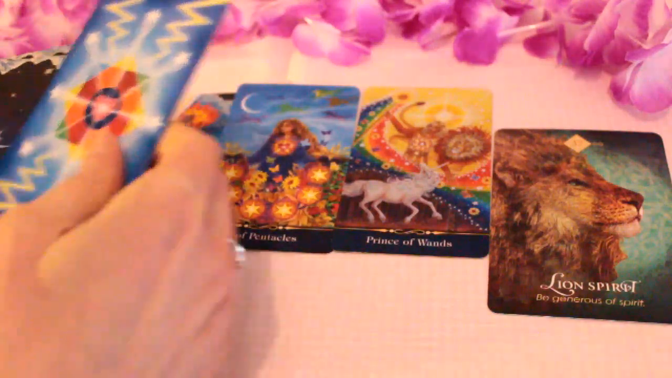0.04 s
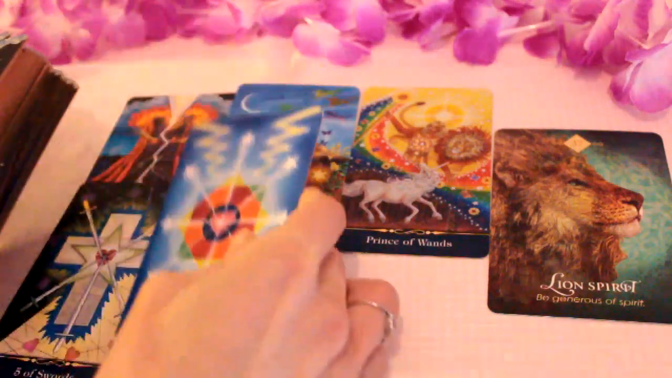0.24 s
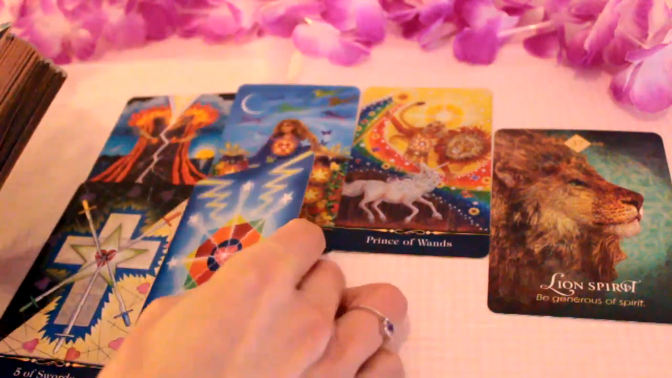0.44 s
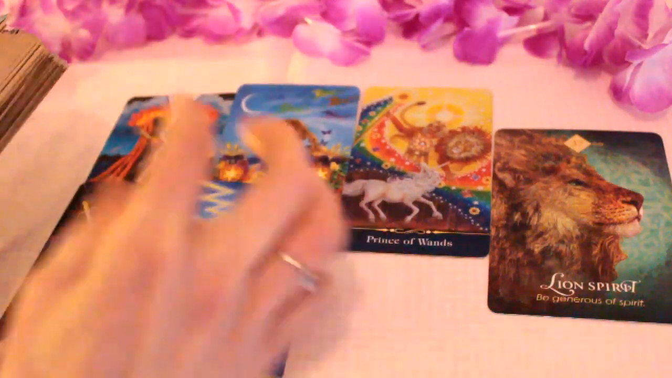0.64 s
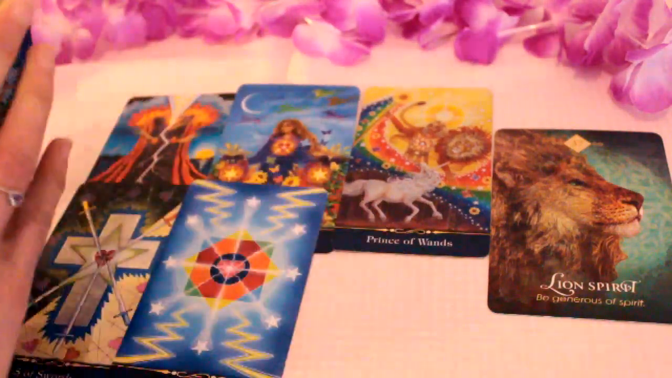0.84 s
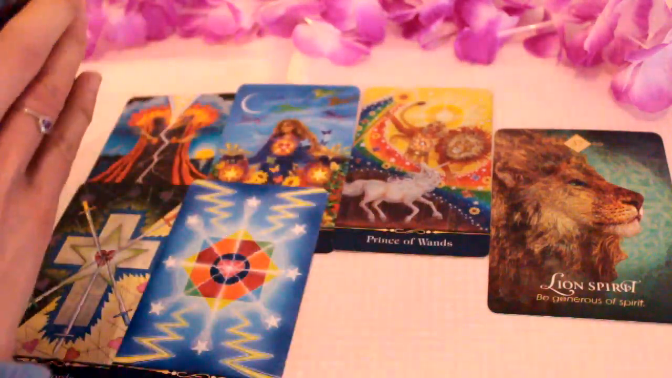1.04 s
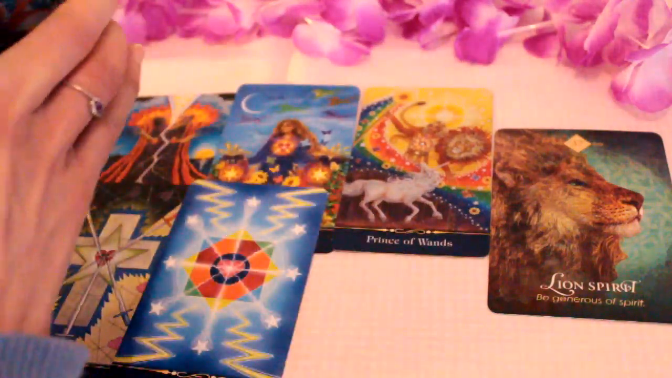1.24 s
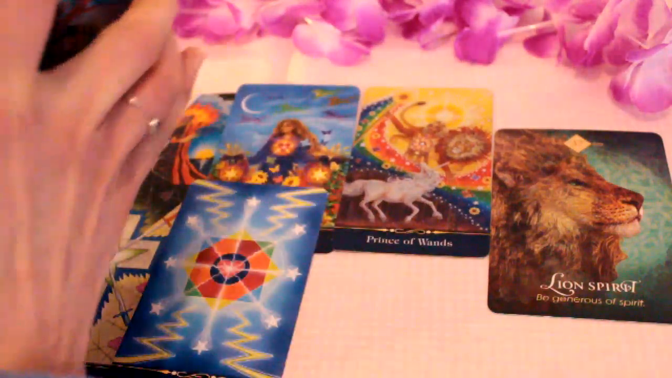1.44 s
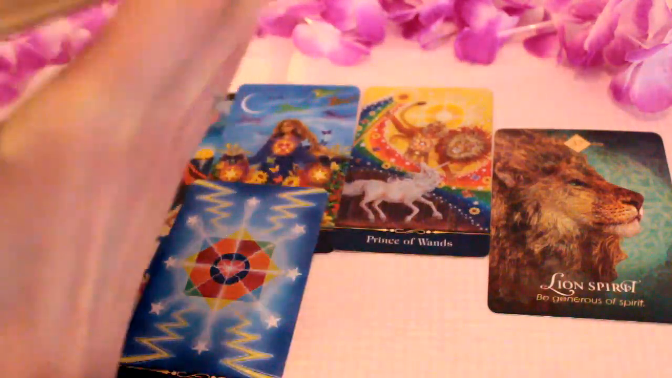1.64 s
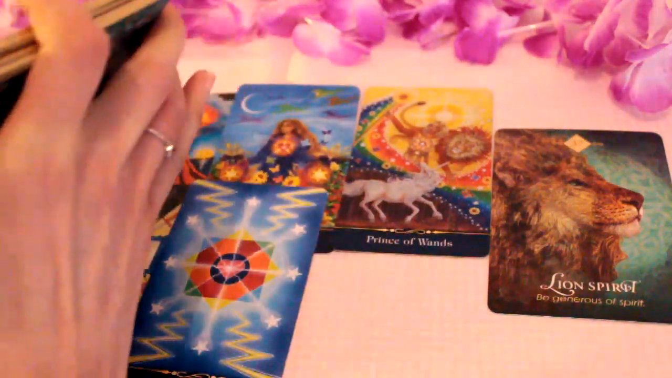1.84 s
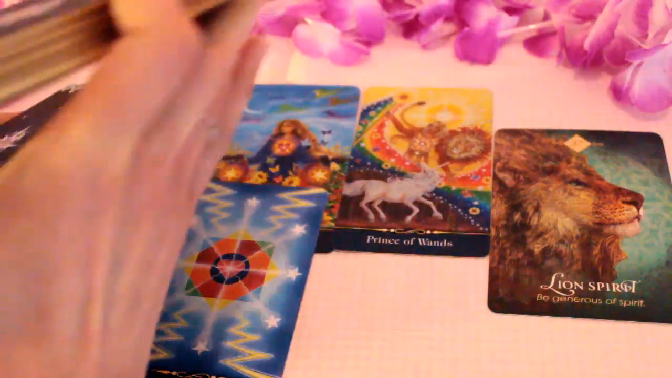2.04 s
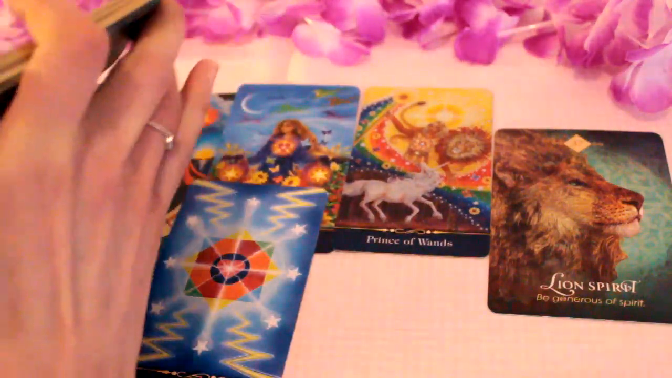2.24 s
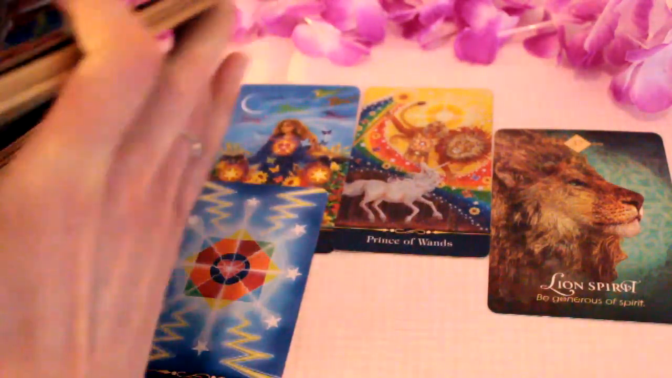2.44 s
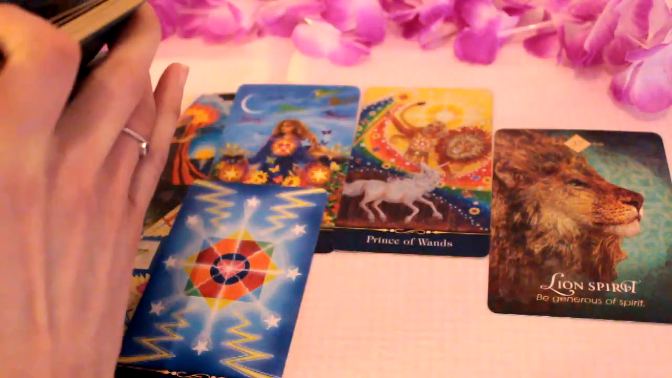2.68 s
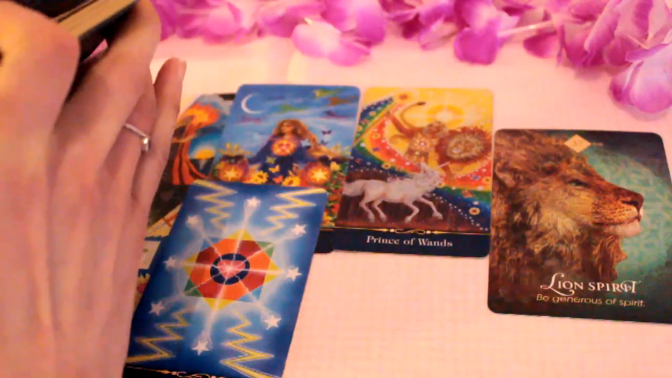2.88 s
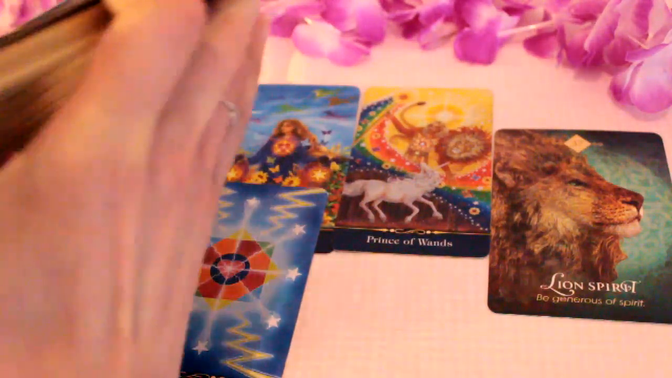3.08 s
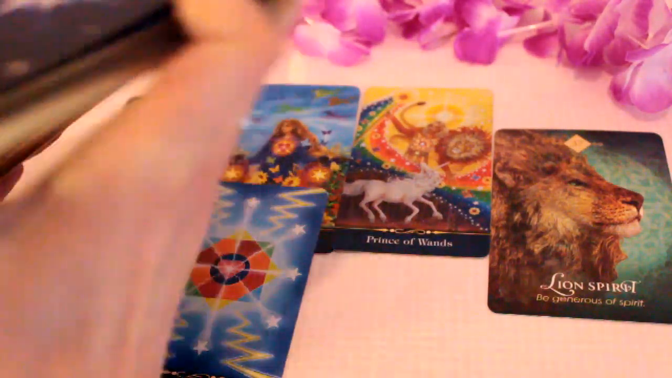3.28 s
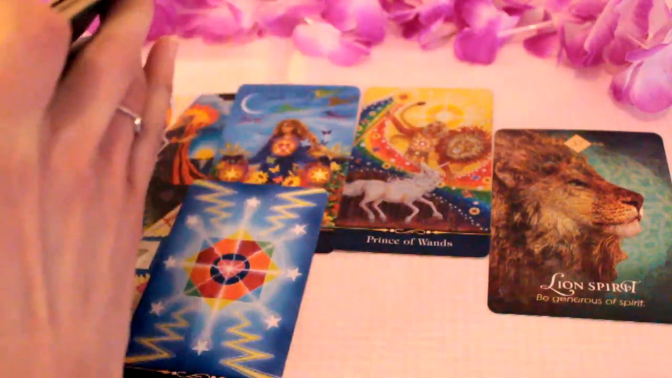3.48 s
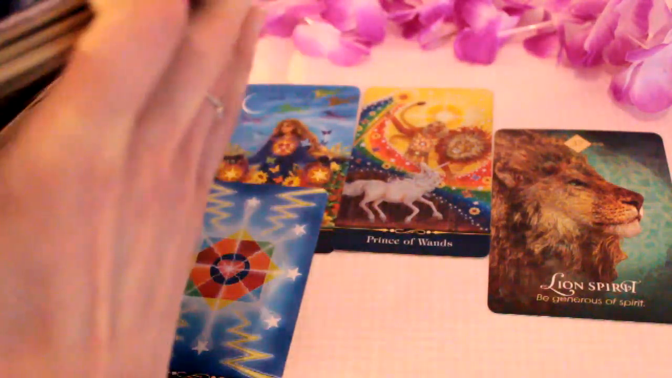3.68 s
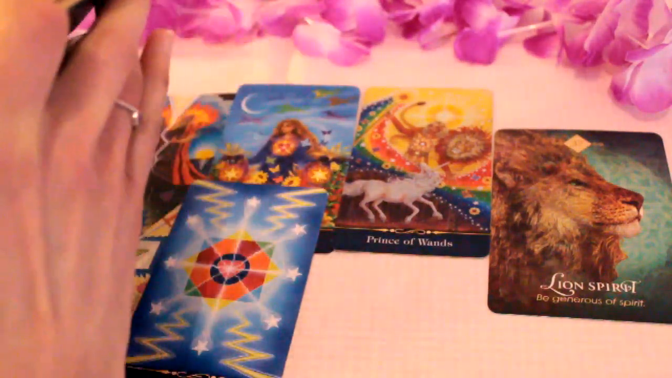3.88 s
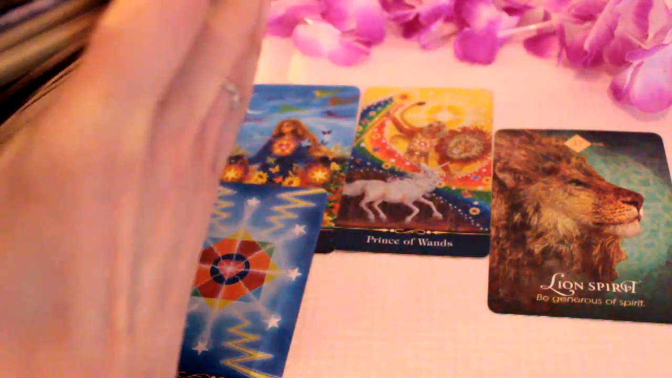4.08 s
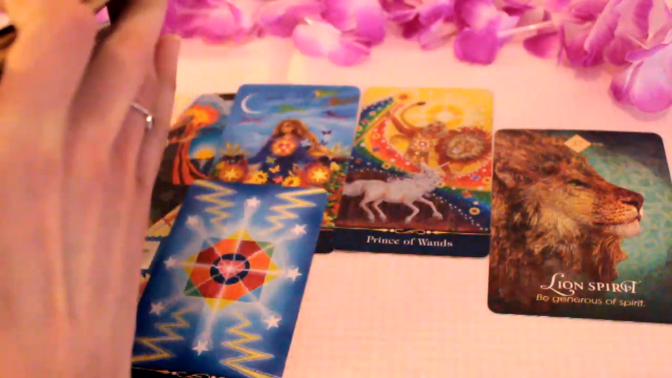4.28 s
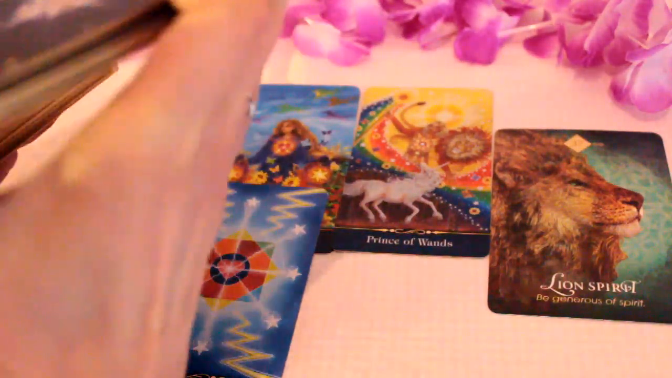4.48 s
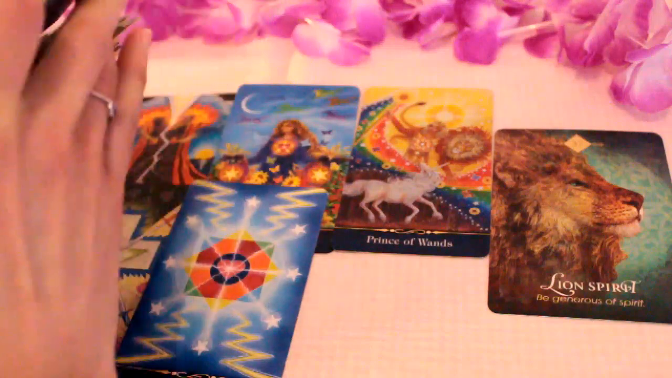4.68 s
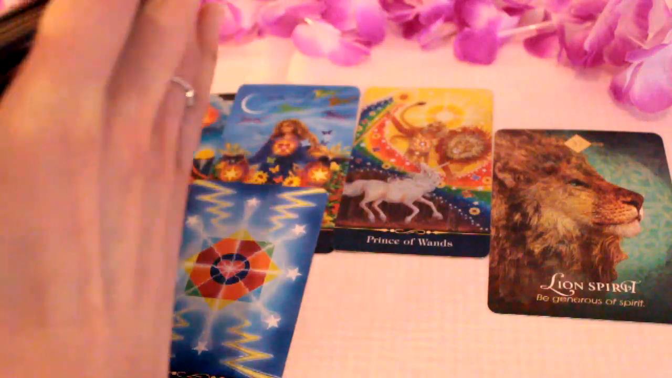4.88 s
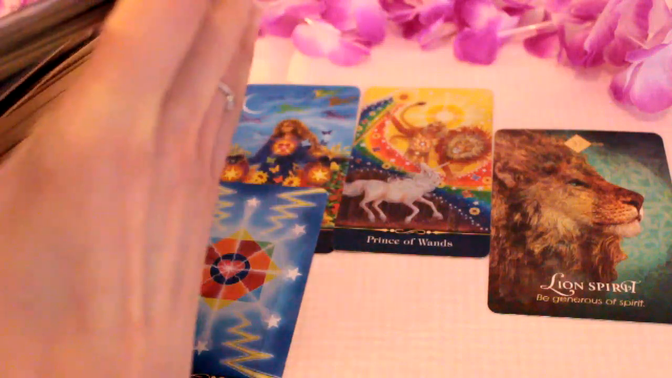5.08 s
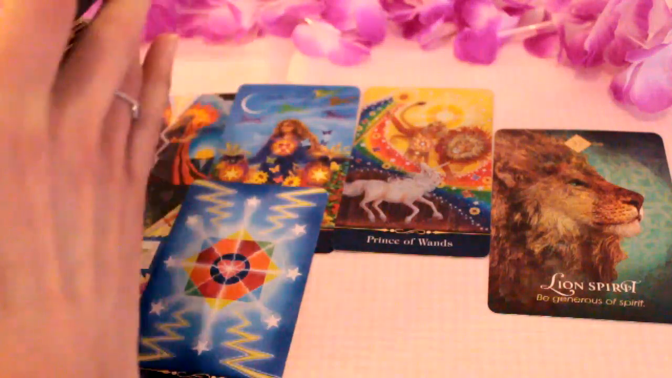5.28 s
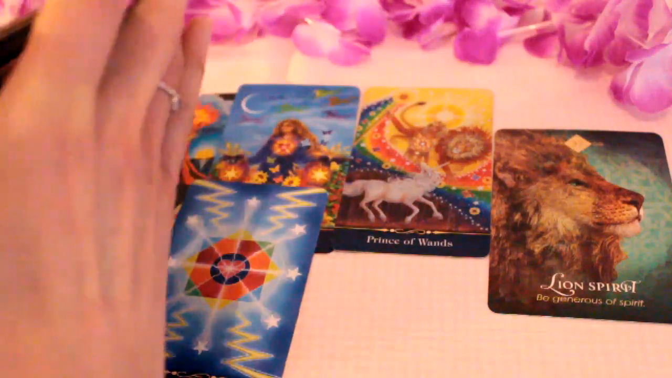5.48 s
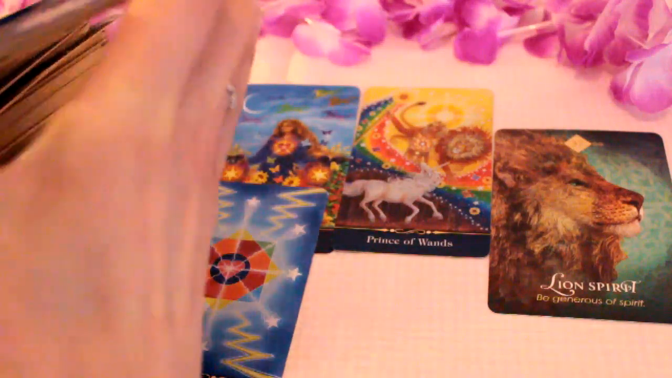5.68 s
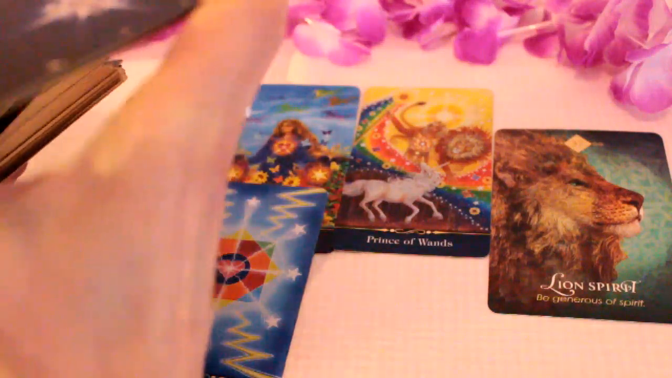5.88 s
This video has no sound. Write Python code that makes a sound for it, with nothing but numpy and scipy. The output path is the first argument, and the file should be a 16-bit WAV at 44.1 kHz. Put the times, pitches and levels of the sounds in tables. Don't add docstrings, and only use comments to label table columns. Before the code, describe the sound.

A stiff card deck is shuffled overhand close to the microphone, with papery slides, edge ticks, hollow packet knocks and one hard slap near three seconds.

```python
import sys
import numpy as np
from scipy import signal
from scipy.fft import rfft, irfft, next_fast_len
from scipy.io import wavfile
from scipy.ndimage import uniform_filter1d, map_coordinates

SR = 44100
rng = np.random.default_rng(int(sys.argv[2]) if len(sys.argv) > 2 else 0)


def persist_wave(psi):
    counts = np.round(np.clip(psi, -1, 1) * 32767).astype(np.int16)
    wavfile.write(sys.argv[1], SR, np.atleast_2d(counts).T)


def to_linear_factor(level_db):
    exponent = np.asarray(level_db, float) / 20
    return 10 ** exponent


N = 261072

# touch_s, length_s, touch_pressure_db, lift_pressure_db, hiss_over_body_db
GLIDES = [(.13, 0.21, -57.5, -40, 3.5), (1.162, 0.073, -37.5, -55.5, 5), (1.24, 0.084, -53.5, -43.5, 6.5),
          (1.32, 0.13, -44.5, -54, 0), (1.5, 0.24, -52.5, -46.5, -15), (1.69, 0.1, -52, -47.5, 8),
          (1.84, 0.19, -42, -62, 1.5), (2.05, 0.094, -59.5, -33, 4), (2.157, 0.07, -47, -38.5, 5),
          (2.46, 0.055, -60, -26.5, 3.5), (2.55, 0.16, -47.5, -43.5, 9), (3.17, 0.063, -51, -22.5, -5),
          (3.26, 0.18, -40, -46, -1), (3.722, .05, -40.5, -36, 5), (3.74, 0.25, -40, -47.5, 7.5),
          (4.02, 0.036, -38, -27.5, -11), (4.07, .1, -40.5, -39.5, 5), (4.19, 0.1, -53, -45, 12),
          (4.3, 0.15, -46.5, -55, 10.5), (4.43, 0.091, -48, -45, 6), (4.51, 0.068, -40.5, -33, 3),
          (4.6, 0.169, -52, -39, 0), (5.09, 0.19, -49.5, -59, 11.5), (5.59, 0.064, -46.5, -26.5, 7),
          (5.66, .11, -30, -43, 9), (5.77, 0.13, -45, -53.5, 3.5)]
# touch_s, length_s, touch_pressure_db, lift_pressure_db, hiss_over_body_db
DRAGS = [(0.0, 0.11, -39, -52, -2), (.385, 0.18, -35.5, -62, -3), (.76, 0.033, -47.5, -36.5, -11),
         (.8, 0.17, -37, -53, -5), (2.24, 0.16, -39.5, -63, -12), (2.74, 0.113, -30.5, -32, -4),
         (2.9, 0.33, -36, -55, -20), (3.46, 0.11, -37.5, -61, -23), (4.78, 0.14, -40, -61, -22),
         (4.99, 0.081, -59, -38, 7.5), (5.24, 0.077, -55.5, -46.5, 1), (5.34, 0.12, -41.5, -55.5, -14)]
TOUCH_DB_PER_MS, LIFT_DB_PER_MS = 1.8, 0.75
HISS_GROWS = 1.18
GLIDE_LOW_DB, DRAG_LOW_DB = -7.5, 3
# frequency_hz, density_db
FACE_HISS = [(500, -33), (1500, -26), (4000, -3), (7000, 3), (10000, 2.5), (13500, -3), (15500, 0)]
# frequency_hz, density_db
LOW_FLEX = [(300, -15), (900, -13), (1300, -4), (1700, 2.5), (2300, -3.5), (3500, -6.5), (7000, -31)]
# frequency_hz, density_db
HIGH_FLEX = [(1200, -40), (2500, -1), (3300, -1), (4500, 0), (6000, -2), (8000, -8), (12000, -18)]
# frequency_hz, density_db
SKIM_HISS = [(6000, -23), (10000, -6), (14000, 2)]
SKIM_DB, SKIM_GROWS = -10, 0.78

# peak_s, level_db, hiss_over_body_db, body_hz, length_ms
SNAGS = [(.0015, -47, -10, 2500, 2.6), (.798, -35, -4, 2760, 24), (1.155, -42, 10, 4470, 3.2),
         (1.258, -54.5, 10, 3000, 24), (1.855, -40.5, -6, 1440, 17), (2.243, -30, -13, 4500, 2.5),
         (2.4921, -32, 2.5, 2330, 14), (2.6809, -35.5, 0, 2350, 26), (2.7483, -22, -15, 1480, 3.1),
         (2.7862, -19, -30, 3730, 4.3), (2.8165, -24, -30, 3800, 4.6), (2.797, -40, 9, 8000, 14),
         (3.208, -31, -28, 2430, 66), (3.2395, -20.5, -5, 2050, 3.4), (3.2901, -37.5, 7.5, 3920, 31),
         (4.023, -43, -14, 3970, 12), (4.035, -23.5, -18, 4950, 15), (4.301, -25, -14, 2550, 1.3),
         (4.45, -36.5, -25, 4330, 25), (4.476, -29, -19, 4430, 51), (4.5066, -19, 0.5, 3330, 34),
         (4.5457, -23, 3.5, 5900, 16), (5.052, -37, -3, 1580, 1.9), (5.0558, -36, 13.5, 7440, 11.5),
         (5.402, -52, -3, 9000, 22), (5.66, -24, -6, 5250, 12)]
# peak_s, level_db, hiss_over_body_db, body_hz, length_ms
SWELLS = [(.0181, -35.5, -5.5, 950, 37), (.224, -43, -16, 5000, 37), (.299, -44, -20, 1440, 29),
          (.3346, -37.5, 1, 6450, 11), (.3834, -35, -14, 1600, 12), (1.135, -53, -1, 4960, 82),
          (1.972, -52.5, 6, 6000, 36), (2.8815, -22, -14, 2470, 1.2), (3.234, -31.5, 6, 4500, 17),
          (3.5028, -41, -2, 2260, 6.8), (4.066, -24.5, -4, 4200, 21), (4.6549, -35.5, -7, 5630, 17),
          (5.0257, -40, -1, 4600, 24), (5.2774, -47, -12, 4410, 21), (5.588, -47, -9, 7000, 2.8),
          (5.619, -29, -16, 6900, 13), (5.7008, -25.5, 6.5, 2800, 8.2)]
# peak_s, level_db,
# hiss_over_body_db, body_hz, length_ms
BRUSHES = [(.3665, -35, -3, 1500, 21), (.3992, -28, -26, 1320, 23), (.4177, -36.5, 2, 2010, 7.2),
           (1.391, -50.5, 3, 2930, 11), (1.5214, -50, -8, 3150, 10), (1.588, -50, -21, 5200, 58),
           (1.8227, -28, 2.5, 4540, 21), (2.137, -25.5, 5, 1700, 11), (2.5151, -36.5, 14, 2340, 12),
           (2.5623, -41, -15, 3250, 26), (2.959, -38.5, 0, 5140, 43), (3.2553, -30.5, 4.5, 3700, 13),
           (3.269, -28, -14, 4000, 3.2), (3.335, -40.5, 3, 9350, 30), (3.7637, -39, 5, 4130, 7.8),
           (4.1582, -36, 8.5, 5080, 6.5), (4.186, -32, -10, 1720, 2.3), (4.3207, -39, -8, 1610, 4.7),
           (4.475, -36, -18, 1690, 31), (4.499, -24.5, 1, 4100, 18), (4.521, -26, 2, 3370, 8.3),
           (4.567, -27.5, -5, 7350, 13), (5.0723, -27, -8, 5000, 19), (5.368, -32.5, -3, 4570, 5.6),
           (1.79, -42, -20, 9400, 47), (1.871, -51, -30, 1450, 40), (4.725, -42, -30, 1240, 33),
         (5.075, -34, -27, 1600, 8), (.19, -49.5, -25, 5500, 40), (.79, -43, -30, 1200, 57),
         (1.65, -57, -25, 5500, 90), (.5, -53, -30, 1200, 90), (2.63, -34.5, -20, 12500, 67),
         (2.888, -36, -20, 12000, 14), (3.825, -40, -18, 6000, 18), (3.88, -40.5, -22, 7000, 33),
         (3.935, -38, -20, 13000, 82), (3.976, -49, -25, 3280, 81), (4.084, -38, -20, 14000, 36),
         (4.27, -38, -20, 10000, 40), (4.315, -34, -20, 13500, 56), (4.507, -31.5, -25, 1600, 5.7),
         (4.558, -21, -7, 4500, 9.8), (4.716, -44, -25, 1680, 17), (4.72, -54, -27, 3320, 28)]
SNAG_RISE, SWELL_RISE, BRUSH_RISE = 0.2, 0.79, 0.53
SCRAPE_CANCEL_SHARE, EDGE_CANCEL_SHARE = 0.45, 0.48

# start_s, level_db, crack_over_ring_db, ring_hz, fall_ms
EDGE_TICKS = [(0.158, -45.5, -5, 1230, 1.3), (0.4192, -32, -12, 1920, 1.2), (0.4235, -37.5, -3, 1280, 1.2),
              (0.677, -46.5, -20, 1810, 2.2), (0.7572, -34, -14, 2200, 0.5),
              (0.8544, -30.5, -15, 5100, 2.1), (0.8635, -32.5, -20, 1500, 2.5),
              (1.159, -32.5, -12, 5070, 1.3), (2.123, -41, 2, 4000, 1), (2.1253, -28.5, 7.5, 4730, 3.9),
              (2.2369, -29.5, -5, 1960, 2), (2.267, -36, -13, 1940.0, 0.54), (2.4922, -34, -8, 2290, 1.5),
              (2.736, -30.5, 5, 1540, 0.66), (2.7501, -16.5, -14.5, 1660, 1.4),
              (2.786, -20.5, -27, 3540, 0.88), (2.8104, -15, -18, 1470, 1.6), (2.816, -22, -33, 3660, 1.2),
              (3.1703, -36, -4.5, 2200, 1.7), (3.4042, -38, 1, 3700, 0.77), (3.2073, -33, -14, 1910, 7.7),
              (3.4668, -37, 0, 2260, 0.98), (3.7823, -38, 7, 2760, 3.8), (4.0478, -28, -15, 4520, 1.4),
              (4.0595, -28, -8, 5000, 1.2), (4.1675, -36, 7.5, 6500, 1.5), (4.7782, -38, 0, 5540, 0.92),
              (5.3283, -36, -13.0, 1920, 1.5), (5.3435, -30.5, -6, 2930, 1.4), (5.647, -24.5, 3, 2650, 4)]
# start_s, level_db, crack_over_ring_db, ring_hz, fall_ms
SLAP = [
    (2.8678, -22, -12, 2050, 1.4),
    (2.8705, -18, -16, 1850, 1),
    (2.872, -6, -1.5, 1950, .7),
    (2.8724, -13, -30, 4200, 1.2),
    (2.8752, -21, -15, 1900, 2),
]
# start_s, level_db, air_pocket_hz, stack_over_pocket_db
KNOCKS = [(0.018, -36, 524, -21), (0.157, -42, 714, 2), (0.401, -40, 560, -8), (0.447, -40, 564, -10),
          (0.868, -43, 260, 4), (2.512, -39, 260, -12), (0.426, -34, 318, 9), (0.676, -57, 540, 13),
          (0.8612, -37, 730, 3), (1.832, -38.5, 474, 12), (2.126, -23.5, 755, 2), (2.239, -36.5, 534, 4),
          (2.2795, -11.5, 564, 2.5), (2.2808, -35, 824, -19), (2.5034, -41.5, 523, 10.5),
          (2.682, -41, 610, 4), (2.75, -29, 604, 11.5), (2.7869, -27, 600, 8), (2.8141, -26.5, 510, -4),
          (2.8722, -29, 550, 2), (3.1699, -43, 577, 4), (3.2362, -37, 770, 3), (3.259, -35, 774, 4),
          (3.4058, -40.5, 330, 4), (3.4671, -30.5, 560, 4.5), (3.5006, -32.5, 895, -11),
          (4.1677, -45, 540, 0), (4.311, -41.5, 350, 3.5), (4.781, -31, 348, -20), (5.3282, -38.5, 675, 2),
          (5.3424, -40, 500, -2), (5.6471, -40, 292, -15), (5.661, -37.5, 338, -17)]
# frequency_hz, level_db, t60_s
DECK_MODES = [(1020, -0.5, 0.018), (1680, -5, 0.017), (2980, 8, 0.009), (4140, 1, 0.0066)]
# start_s, level_db
TAPS = [
    (3.4668, -32.5),
    (4.7796, -26),
]
# start_s, level_db, pitch_hz
PUFFS = [
    (0.425, -53, 131),
    (0.857, -49, 107),
    (2.123, -47.5, 122),
    (2.127, -38, 234),
    (2.508, -59, 145),
    (2.746, -47.5, 120),
    (2.81, -64, 110),
    (2.873, -56, 80),
    (3.505, -51.5, 139),
    (4.171, -58, 139),
]

# frequency_hz, t60_s
ROOM_DECAY = [(200, 0.34), (1400, 0.61), (3700, 0.64), (7000, 0.53), (12000, 0.28)]
# frequency_hz, level_db
WALL_COLOUR = [(200, 2), (450, -1), (850, 2), (1500, -4.5), (4000, -10), (8000, -13.5), (15000, -22)]
# frequency_hz, density_db
ROOM_TONE = [(20, -12), (35, -2), (60, -4.5), (150, -6.5), (300, 5), (1000, 4.5), (2500, 4.5), (6000, -2),
             (15000, -6)]
# time_s, level_db
RUMBLE = [(0.0, -84), (0.66, -80), (0.84, -76.5), (1.55, -78.5), (1.68, -89), (1.91, -83), (2.32, -66),
          (2.54, -74), (2.72, -66), (3.03, -81), (3.41, -73), (3.79, -79), (4.5, -89), (4.91, -75),
          (5.34, -77), (5.92, -81)]
RUMBLE_HZ, RUMBLE_SHARPNESS = 161, 3
# frequency_hz, level_db
BAND_EDGE = [(15350, 0), (15600, -36), (16400, -48)]


def unit(x):
    return x / np.sqrt(np.mean(x ** 2) + 1e-20)


def along(points, hz):
    f, v = np.transpose(points)
    return np.interp(np.log(hz + 1), np.log(f + 1), v)


def wobble(rate):
    knots = rng.standard_normal(int(N * rate / SR) + 4)
    return map_coordinates(knots, [np.arange(N) * rate / SR])


def coloured(x, spectrum):
    size = next_fast_len(len(x) + 8192)
    gain = to_linear_factor(along(spectrum, np.fft.rfftfreq(size, 1 / SR)))
    return irfft(rfft(x, size) * gain, size)[:len(x)]


def resonant(x, hz, sharpness):
    peak = signal.iirpeak(hz, sharpness, SR)
    return signal.lfilter(*peak, signal.lfilter(*peak, x))


def without_lows(x, hz, order):
    return signal.sosfilt(signal.butter(order, hz, "high", fs=SR, output="sos"), x)


def add(track, s, sound):
    i = max(round(s * SR), 0)
    track[i:i + len(sound)] += sound[:len(track) - i]


def rub(spectrum, grain_db, patchy_db):
    grain = wobble(600) + 1.1 * wobble(120)
    contacts = rng.standard_normal(N) * to_linear_factor(grain_db * grain)
    z = signal.stft(contacts, nperseg=256)[2]
    field = uniform_filter1d(rng.standard_normal(z.shape), size=4, axis=0)
    field = uniform_filter1d(field, size=14, axis=1)
    patchy = signal.istft(z * to_linear_factor(patchy_db * unit(field)), nperseg=256)[1][:N]
    return unit(coloured(patchy, spectrum))


def strokes(rows):
    t = np.arange(0, N + 64, 32) / SR
    s, length, in_db, out_db, hiss_db = np.transpose(rows)[..., None]
    press = in_db + (out_db - in_db) * np.clip((t - s) / length, 0, 1)
    before, after = np.maximum(s - t, 0), np.maximum(t - s - length, 0)
    edge = -1000 * (TOUCH_DB_PER_MS * before + LIFT_DB_PER_MS * after)
    top = np.maximum(in_db, out_db)
    levels = press + edge, top + HISS_GROWS * (press - top) + hiss_db + edge
    return [np.interp(np.arange(N) / SR, t, np.maximum(v.max(axis=0), -120)) for v in levels]


def slides():
    glide_db, glide_hiss_db = strokes(GLIDES)
    drag_db, drag_hiss_db = strokes(DRAGS)
    hiss_db, body_db = np.maximum(glide_hiss_db, drag_hiss_db), np.maximum(glide_db, drag_db)
    drag_share = 1 / (1 + to_linear_factor(glide_db - drag_db))
    tilt_db = GLIDE_LOW_DB + (DRAG_LOW_DB - GLIDE_LOW_DB) * drag_share
    low_share = 1 / (1 + to_linear_factor(-2 * tilt_db))
    grip_db = 0.7 * wobble(45)
    low = np.sqrt(low_share) * rub(LOW_FLEX, grain_db=1.5, patchy_db=2.8)
    high = np.sqrt(1 - low_share) * rub(HIGH_FLEX, grain_db=1.5, patchy_db=2.8)
    hiss = rub(FACE_HISS, grain_db=1.5, patchy_db=0.8)
    skim_db = SKIM_DB + SKIM_GROWS * np.clip(hiss_db - body_db, -20, 20)
    hiss = hiss + to_linear_factor(skim_db) * rub(SKIM_HISS, grain_db=1.5, patchy_db=0.8)
    return to_linear_factor(hiss_db - 6.5 + grip_db) * hiss + to_linear_factor(body_db - 1.5 + grip_db) * (low + high)


def scuffs():
    out, t = np.zeros(N), np.arange(-3072, 3072) / SR
    grit = to_linear_factor(1.2 * wobble(500))
    kinds = (SNAGS, SNAG_RISE), (SWELLS, SWELL_RISE), (BRUSHES, BRUSH_RISE)
    for rows, rise in kinds:
        for s, db, hiss_db, hz, ms in rows:
            rise_ms, fall_ms = max(rise * ms, 0.2), max((1 - rise) * ms, 0.2)
            shape = to_linear_factor(np.where(t < 0, 9000 * t / rise_ms, -9000 * t / fall_ms))
            local_grit = grit[round(s * SR * 0.9):][:len(t)]
            friction, hiss = rng.standard_normal((2, len(t))) * local_grit
            flex = unit(resonant(friction, hz, sharpness=3.5))
            flex = flex + 0.4 * unit(resonant(friction, min(2.1 * hz, 15000), sharpness=4.5))
            base = unit(resonant(friction, 0.9 * hz, sharpness=0.65))
            body = without_lows(0.42 * flex + 0.9 * base, SCRAPE_CANCEL_SHARE * hz, order=3)
            sound = shape * (body + to_linear_factor(hiss_db) * unit(coloured(hiss, FACE_HISS)))
            skip = max(round((-t[0] - s) * SR), 0)
            add(out, s + t[0], to_linear_factor(db - 2.0) * sound[skip:])
    return out


def ticks():
    out, t = np.zeros(N), np.arange(1024) / SR
    for s, db, crack_db, hz, fall_ms in EDGE_TICKS + SLAP:
        chatter = rng.standard_normal((2, len(t))) * to_linear_factor(-6000 * t / max(fall_ms, 0.2))
        chatter[:, 0] = 6
        ring = unit(resonant(chatter[0], hz, sharpness=1.33))
        ring = ring + 0.5 * unit(resonant(chatter[0], 1.88 * hz, sharpness=0.98))
        ring = without_lows(ring, EDGE_CANCEL_SHARE * hz, order=2)
        crack = unit(resonant(chatter[1], 8400, sharpness=0.41))
        level = to_linear_factor(db - 11.5) * np.sqrt(fall_ms + 0.96)
        add(out, s - 0.0002, level * (ring + to_linear_factor(crack_db) * crack))
    return out


def knocks():
    out, t = np.zeros(N), np.arange(2048) / SR

    def ring(hz, t60):
        return np.sin(2 * np.pi * hz * t) * to_linear_factor(-60 * t / t60)

    for s, db, hz, stack_db in KNOCKS:
        loose = 1 + 0.094 * rng.standard_normal(4)
        stack = -0.45 * ring(800 * loose[0], 0.034) + ring(1050 * loose[1], 0.022)
        stack += 0.66 * ring(1270 * loose[2], 0.025) + 0.49 * ring(2030 * loose[3], 0.016)
        onset = 1 - np.exp(-t / 0.00031)
        add(out, s, to_linear_factor(db + 1.5) * onset * (ring(hz, 0.016) + 0.47 * to_linear_factor(stack_db) * stack))
    return out


def taps():
    out, t = np.zeros(N), np.arange(2048) / SR
    for s, db in TAPS:
        ring = np.zeros(len(t))
        for hz, level_db, t60 in DECK_MODES:
            struck_db = level_db + 1.1 * rng.standard_normal()
            ring += to_linear_factor(struck_db - 60 * t / t60) * np.sin(2 * np.pi * hz * t)
        add(out, s, to_linear_factor(db) * (1 - np.exp(-t / 0.00019)) * ring)
    return out


def puffs():
    out, t = np.zeros(N), np.arange(4096) / SR
    for s, db, hz in PUFFS:
        shape = to_linear_factor(db + 5.5 - 60 * t / 0.057) * (1 - np.exp(-t / 0.0072))
        add(out, s, shape * np.sin(2 * np.pi * hz * t))
    return out


def room(x):
    out, step = np.zeros(N + SR), SR // 4
    for start in range(0, N, step):
        hz, t, z = signal.stft(rng.standard_normal(SR * 3 // 4), SR, nperseg=256)
        decay = to_linear_factor(-60 * t / along(ROOM_DECAY, hz)[:, None])
        tail = signal.istft(z * decay, SR, nperseg=256)[1]
        tail *= 1 - np.exp(-np.arange(len(tail)) / SR / 0.018)
        add(out, start / SR, signal.fftconvolve(x[start:start + step], tail / np.linalg.norm(tail)))
    return coloured(out[:N], WALL_COLOUR)


def room_tone():
    return to_linear_factor(-55.5) * rub(ROOM_TONE, grain_db=0.2, patchy_db=0.6)


def rumble():
    s, db = np.transpose(RUMBLE)
    level = to_linear_factor(np.interp(np.arange(N) / SR, s, db) + 1.0)
    return level * unit(resonant(rng.standard_normal(N), RUMBLE_HZ, RUMBLE_SHARPNESS))


def scene():
    edges = without_lows(ticks() + scuffs(), 1150, order=3)
    cards = slides() + edges + knocks() + taps()
    cards = without_lows(cards, 210, order=2)
    return (cards + to_linear_factor(-6.5) * room(cards) + puffs() + room_tone() + rumble())[None]


def low_pass(x):
    return signal.sosfilt(signal.butter(12, 16450, fs=SR, output="sos"), x)


def record(dry):
    clipped = dry[0] / (1 + np.abs(dry[0] / 0.99) ** 8) ** (1 / 8)
    offset = 0.001
    mix = coloured(clipped, BAND_EDGE)[None] + offset
    return low_pass(mix)


dry = scene()
out = record(dry)
persist_wave(out)
```